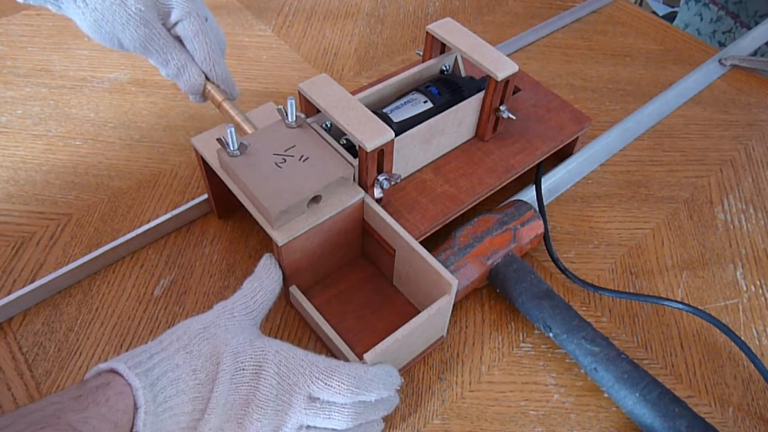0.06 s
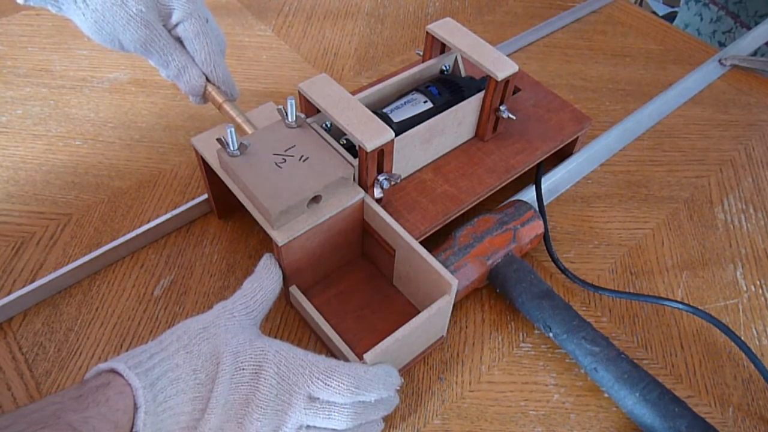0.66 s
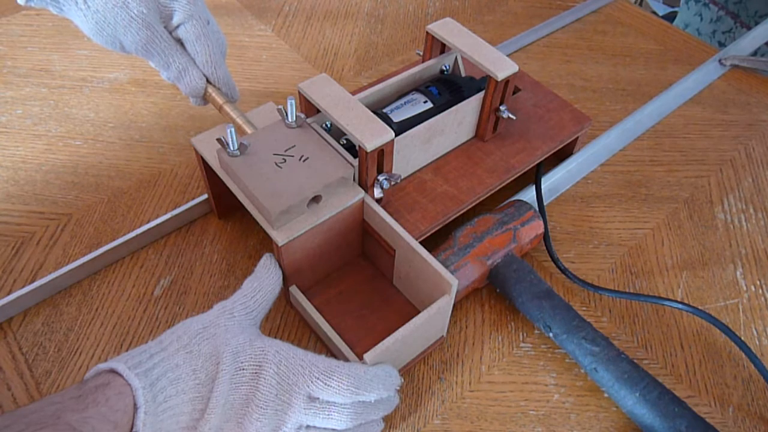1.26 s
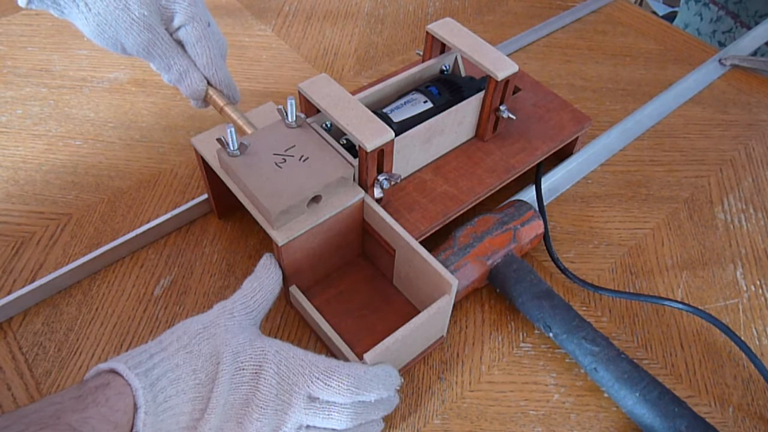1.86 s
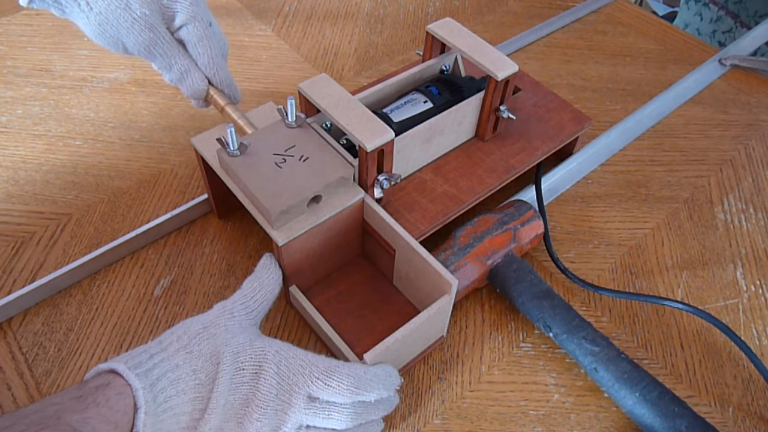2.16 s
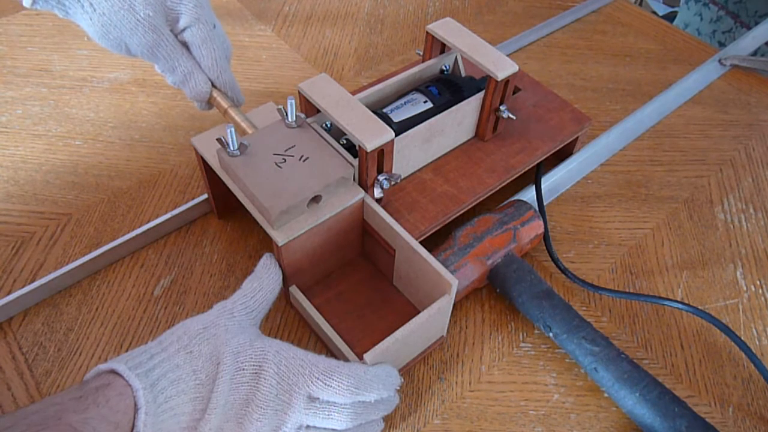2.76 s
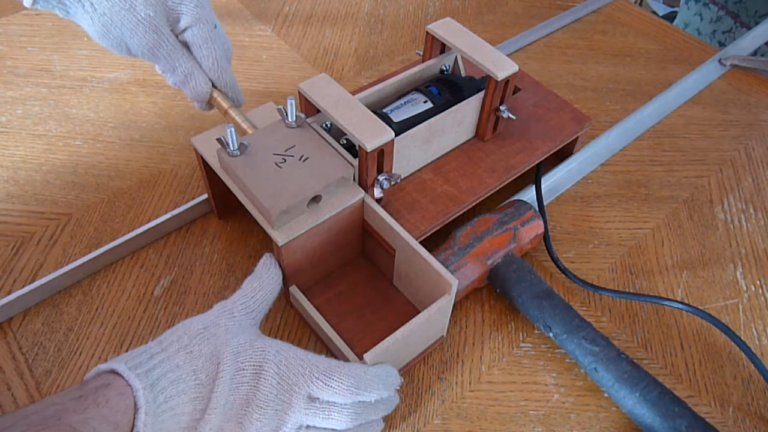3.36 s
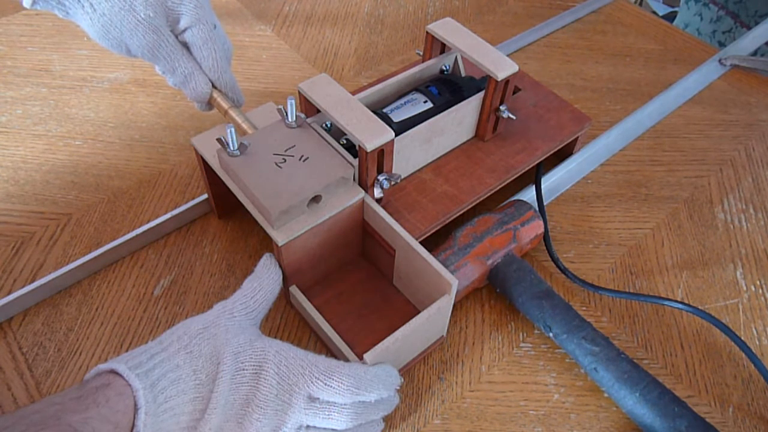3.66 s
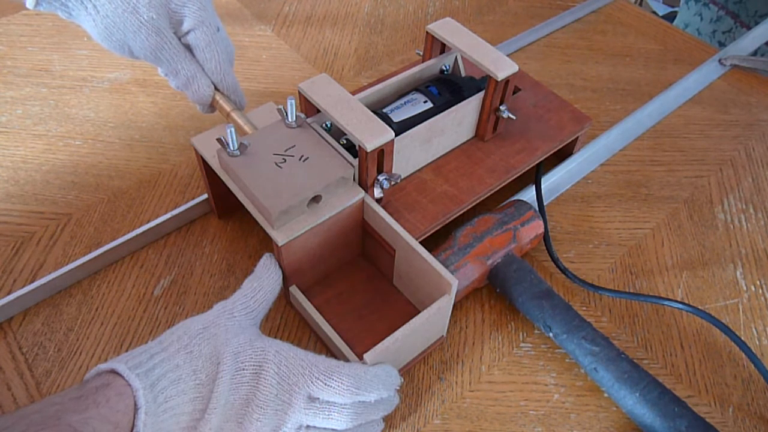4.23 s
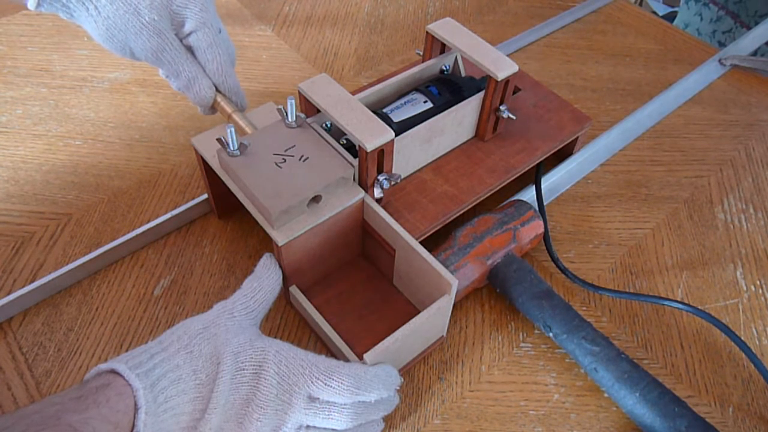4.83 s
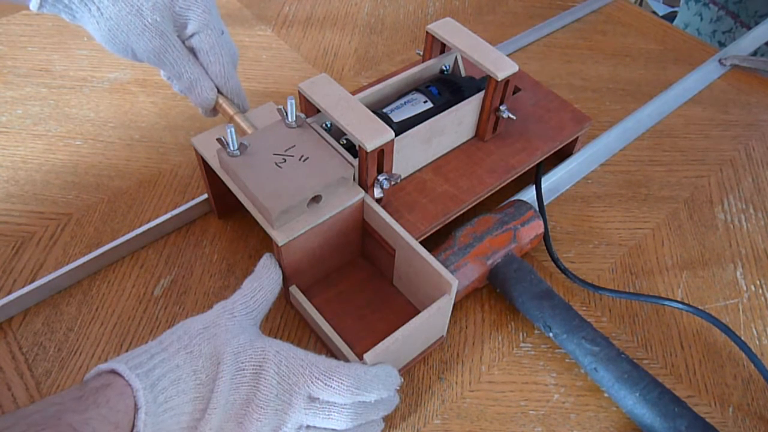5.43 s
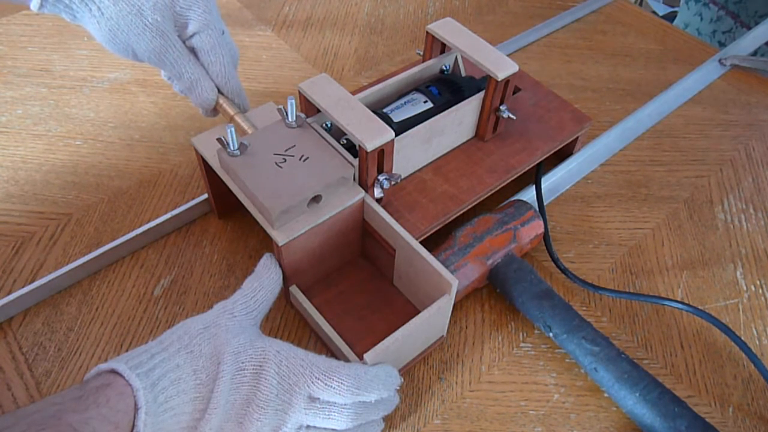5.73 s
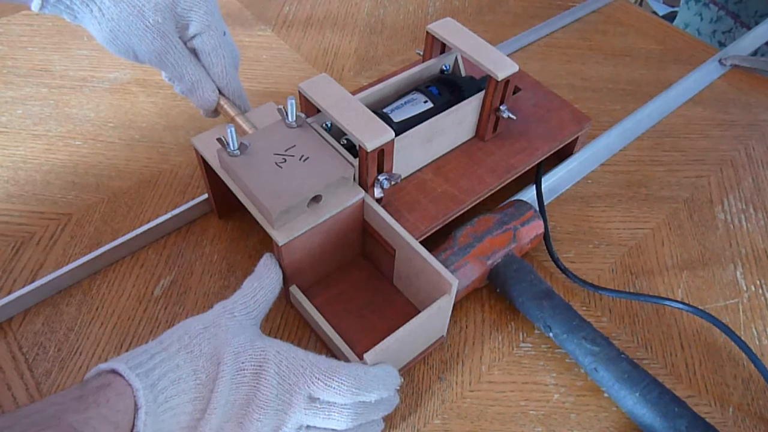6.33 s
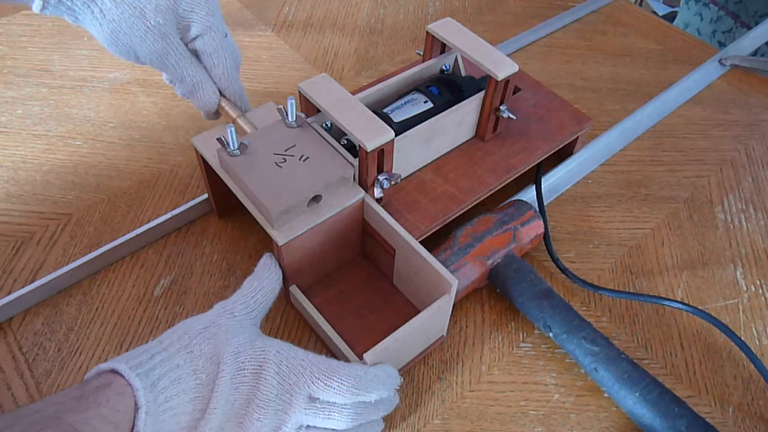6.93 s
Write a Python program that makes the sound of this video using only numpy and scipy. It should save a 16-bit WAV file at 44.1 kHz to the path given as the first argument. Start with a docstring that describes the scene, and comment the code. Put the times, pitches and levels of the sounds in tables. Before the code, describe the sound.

A small rotary tool whines steadily, then drops in pitch with gritty scraping and thin shrieks as its disc cuts into wire.

```python
"""A mains-driven rotary tool whines at high speed, clamped in a wooden jig on a table.
A wire fed against its cutting disc bites lightly, then deeply, and drags the motor down.
The falling tones swell and dip through peaks and notches of room and jig, and excite wire modes.
Mains ripple roughens them. Grit scrapes in a pattern that repeats each turn; the slipping wire shrieks.
Fan air and a faint stator buzz lie underneath."""
import sys
import numpy as np
from scipy import signal
from scipy.fft import rfft, irfft, next_fast_len
from scipy.io import wavfile
from scipy.ndimage import uniform_filter1d, map_coordinates

SR = 44100
rng = np.random.default_rng(int(sys.argv[2]) if len(sys.argv) > 2 else 0)


def master_out(mix):
    """Clip the mix to full scale and print it as 16-bit PCM to the path in sys.argv[1]."""
    frames = np.transpose(np.atleast_2d(mix))
    ceiling = np.clip(frames, -1, 1)
    pcm = np.round(ceiling * 32767).astype(np.int16)
    wavfile.write(sys.argv[1], SR, pcm)


N = 317079
TIME_S = np.arange(N) / SR
FREE_HZ, LIGHT_BITE_HZ, DEEP_BITE_HZ = 467, 432, 323   # shaft speeds
RIPPLE_HZ = 120   # twice mains


def from_db(db):
    """Decibels to gain."""
    return 10 ** (np.asarray(db) / 20)


def unit_rms(x):
    """Scale to rms 1."""
    return x / np.sqrt(np.mean(np.abs(x) ** 2) + 1e-20)


def drift(rate_hz):
    """Slow random wander, rms about 1."""
    hop = 40
    pole = np.exp(-2 * np.pi * rate_hz * hop / SR)
    noise = rng.standard_normal(N // hop + 2002)
    slow = signal.lfilter([1], [1, -2 * pole, pole * pole], noise)[2000:]
    return np.interp(np.arange(N) / hop, np.arange(len(slow)), unit_rms(slow))


def coloured(x, spectrum):
    """Apply a smooth spectral shape; rms 1."""
    size = next_fast_len(N)
    freq_hz, gain_db = np.transpose(spectrum)
    bins_hz = np.maximum(np.arange(size // 2 + 1) * SR / size, 1)
    gain = from_db(np.interp(np.log(bins_hz), np.log(freq_hz), gain_db))
    return unit_rms(irfft(rfft(x, size) * gain, size)[..., :N])


def resonance(x, centre_hz, width_hz):
    """Two-pole band-pass, peak gain 1."""
    radius = np.exp(-np.pi * width_hz / SR)
    feedback = [1, -2 * radius * np.cos(2 * np.pi * centre_hz / SR), radius ** 2]
    return signal.lfilter(np.array([1, 0, -1]) * (1 - radius ** 2) / 2, feedback, x)


def bells_db(bells, pitch_hz):
    """Summed gain of bell-shaped peaks and notches at a pitch."""
    return sum(gain_db * 0.5 ** np.minimum((2 * (pitch_hz - centre_hz) / width_hz) ** 2, 20)
               for centre_hz, width_hz, gain_db in bells)


def stereo(pair, side_db=-25):
    """Mid and side to left and right."""
    return pair[0] + from_db(side_db) * pair[1] * np.array([[1], [-1]])


def mains_ripple(amount):
    """Torque swells twice per mains cycle."""
    return 1 + amount * np.cos(2 * np.pi * RIPPLE_HZ * TIME_S)


def room(x, t60_s=0.68, tail_db=0.5):
    """Direct sound plus the diffuse tail of a small room."""
    age_s = np.arange(SR // 2) / SR
    tail = rng.standard_normal(len(age_s)) * from_db(-60 * age_s / t60_s) * (age_s > 0.003)
    tail = tail / np.sqrt(np.sum(tail ** 2))
    return x + from_db(tail_db) * signal.fftconvolve(x, tail[None], axes=1)[:, :N]


def stator_buzz(load, free_db=-61.5, loaded_db=-52, octave_db=-61, waver_db=1.5):
    """Hum at the ripple rate, growing with current, plus a steady octave."""
    phase = 2 * np.pi * RIPPLE_HZ * TIME_S
    level_db = free_db + load * (loaded_db - free_db) + waver_db * drift(4.6)
    return np.sqrt(2) * (from_db(level_db) * np.sin(phase) + from_db(octave_db) * np.sin(2 * phase))


# Fan and brush spectrum: freq_hz, gain_db
AIR_SPECTRUM = [(30, -21), (100, -10.5), (170, -10.5), (230, -1.5), (400, -0.5), (1300, 1), (2100, 1),
                (3150, 3.5), (4600, 2), (5300, 2), (6800, -2.5), (7600, 0), (9700, -1.5), (12900, -2),
                (15500, -18)]
# Vent rasp, relative to the hiss: centre_hz, width_hz, gain_db
VENT_BANDS = [(3250, 300, -15), (4430, 230, -13.5)]


def fan_air(speed_hz, turns, free_db=-33, flutter_db=0.8, flicker_db=3):
    """Air and brush hiss pulses with shaft and mains; vents rasp. Both fade as the shaft slows."""
    per_turn = 1 + 0.11 * np.cos(2 * np.pi * turns)
    pulsing = mains_ripple(0.08) * per_turn * from_db(flutter_db * drift(23))
    hiss = coloured(rng.standard_normal((2, N)) * pulsing, AIR_SPECTRUM)
    for centre_hz, width_hz, gain_db in VENT_BANDS:
        gain = from_db(gain_db + flicker_db * drift(12))
        hiss += gain * unit_rms(resonance(rng.standard_normal((2, N)), centre_hz, width_hz))
    return from_db(free_db) * (speed_hz / FREE_HZ) ** 3.3 * stereo(hiss)


# Wire slips on the rim: start_s, hold_s, pitch_hz, width_hz, level_db
WIRE_SLIPS = [(5.34, .2, 12200, 260, -36), (5.55, .5, 12300, 350, -43), (6.52, .24, 8560, 70, -37),
              (6.79, .08, 8520, 50, -32)]


def wire_shrieks(attack_s=0.018, release_s=0.026):
    """Friction feeds one narrow mode of wire or disc per slip."""
    out = 0
    for start_s, hold_s, pitch_hz, width_hz, level_db in WIRE_SLIPS:
        attack = np.clip((TIME_S - start_s) / attack_s, 0, 1)
        release = np.exp(-np.maximum(TIME_S - start_s - hold_s, 0) / release_s)
        band = resonance(rng.standard_normal(N), pitch_hz, width_hz)
        ring = unit_rms(resonance(band, pitch_hz, width_hz))
        out += from_db(level_db) * attack * release * ring
    return out


def rim_grit(turns, wear_turns=12.2, lasting_db=-3, rim_points=96):
    """The rough rim passes once a turn; wear renews part of its pattern, the rest lasts."""
    fresh = rng.standard_normal((int(N / SR * 520), rim_points))   # one row per turn, plus spare
    wearing = unit_rms(signal.lfilter([1], [1, -np.exp(-1 / wear_turns)], fresh, axis=0))
    lasting = unit_rms(irfft(np.exp(2j * np.pi * rng.random(rim_points // 2 + 1))))   # flat spectrum
    rim = (wearing + from_db(lasting_db) * lasting).ravel()
    return unit_rms(map_coordinates(rim, [turns * rim_points], order=3, mode="nearest"))


# Scrape level, set by feed pressure: time_s, level_db
FEED_CURVE = [(4.9, -68), (5.2, -35), (5.37, -30.5), (5.45, -32), (5.9, -33), (6.14, -28), (6.29, -28.5),
              (6.38, -25), (6.47, -30.5), (6.54, -28.5), (6.9, -28), (7.12, -28), (7.19, -33)]
# Scrape spectrum: freq_hz, gain_db
SCRAPE_SPECTRUM = [(40, -51), (300, 4), (1000, -2), (1600, -7), (2600, -1.5), (3300, -7.5), (5000, -5),
                   (7000, 1), (9300, -2.5), (11500, 0), (13300, -6), (14600, -4), (15600, -15)]
# Disc and wire resonances: centre_hz, width_hz, light_bite_db, deep_bite_db
DISC_MODES = [(4210, 590, -16, 4), (5820, 140, 10.5, 3), (6190, 150, 1, 12.5), (7540, 250, 3, -23),
              (8370, 51, -3, 1), (8970, 150, 10, 9), (9740, 320, -28, 7), (10880, 200, -5, 11),
              (12250, 250, 6, 15.5), (12450, 120, 12.5, 20)]


def disc_scrape(turns, depth, chips_db=-8, chatter_db=0.9, ring_light_db=-4.5, ring_deep_db=-7):
    """Grit scrapes the wire, chips hiss; the deepening cut damps some modes and frees others."""
    grit = np.array([rim_grit(turns) for _ in range(2)])
    highpass = signal.butter(1, 9000, "high", fs=SR, output="sos")
    chips = signal.sosfilt(highpass, rng.standard_normal((2, N)))
    contact = (grit + from_db(chips_db) * chips) * from_db(chatter_db * drift(24))
    contact *= mains_ripple(0.45 - 0.12 * depth)
    scrape = coloured(room(contact), SCRAPE_SPECTRUM)
    ring = sum(from_db(light_db + depth * (deep_db - light_db)) * resonance(scrape, centre_hz, width_hz)
               for centre_hz, width_hz, light_db, deep_db in DISC_MODES)
    ring_db = ring_light_db + depth * (ring_deep_db - ring_light_db)
    level_db = np.interp(TIME_S, *np.transpose(FEED_CURVE))
    return from_db(level_db) * stereo(unit_rms(scrape + from_db(ring_db) * ring))


# Room and jig peaks and notches: centre_hz, width_hz, gain_db
ROOM_AND_JIG_RESPONSE = [(300.2, 5.0, -10.1), (312.0, 9.7, -12.7), (324.6, 5.5, -9.7), (348.8, 17.4, 4.7),
                         (372.6, 14.2, -13.1), (416.7, 4.5, -8.0), (439.5, 8.0, -7.5), (466.5, 10.0, 2.6),
                         (654.7, 57.5, 15.1), (816.7, 33.8, 8.0), (943.3, 6.0, 3.1), (1421.5, 5.2, -6.9),
                         (1891.8, 16.5, 7.4), (2359.2, 4.5, -8.8)]
# Modes of the pressed wire: centre_hz, width_hz, gain_db, onset_speed_hz
WIRE_MODES = [(1815.0, 70.0, 7.0, 467), (2442.0, 85.0, 13.5, 325), (8515.0, 90.0, 15.0, 330),
              (12272.1, 253.0, 13.9, 467)]


def gliding_tone_gain(order, speed_hz, grip_span_hz=9, hop=20):
    """A tone swells and dips through the room and jig response; wire modes fade in as the shaft slows."""
    coarse_hz = speed_hz[::hop]
    gripped = [(centre_hz, width_hz, gain_db * np.clip((onset_hz - coarse_hz) / grip_span_hz, 0, 1))
               for centre_hz, width_hz, gain_db, onset_hz in WIRE_MODES]
    pitch_hz = order * coarse_hz
    total_db = bells_db(ROOM_AND_JIG_RESPONSE, pitch_hz) + bells_db(gripped, pitch_hz)
    return np.interp(TIME_S, TIME_S[::hop], from_db(total_db))


# Rotor and disc tones, before peaks and notches: order, free_db, light_bite_db, deep_bite_db
SHAFT_TONES = [(1, -19.5, -18, -28.5), (2, -21, -33, -43.5), (3, -32, -41.5, -43), (4, -41.5, -44.5, -68),
               (5, -41, -67, -53), (6, -51.5, -44.5, -51), (7, -49, -59, -76), (8, -48, -48.5, -43.5),
               (10, -52.5, -46, -59), (14, -65, -51, -47), (15, -52.5, -58, -57), (17, -59, -44.5, -64),
               (18, -43.5, -41, -60), (19, -57, -72, -47), (20, -50.5, -73, -47), (25, -73, -58, -51.0),
               (26, -54, -66, -55), (27, -58, -59, -56), (28, -63.1, -52, -51), (30, -83, -74, -54)]
# Torque ripple sidebands, relative to their tone: order, ripple_multiple, free_db, loaded_db
RIPPLE_SIDEBANDS = [(1, -1, -35, -31.5), (1, 1, -18, -13.5), (1, 2, -32, -28), (2, -2, -30, -14.5),
                    (2, -1, -28.5, -6.5), (2, 1, -23, -14), (2, 2, -38, -17), (3, -2, -21.5, -11.5),
                    (3, -1, -28.5, -8), (3, 1, -17.5, -6), (4, -2, -12.5, -12), (4, 1, -37, -3),
                    (8, -1, -7, 1), (8, 1, -28, 3)]


def motor_whine(speed_hz, turns, load, depth, judder, wander_db=0.62, sideband_deep_db=-5):
    """Wavering shaft harmonics; their sidebands grow with current and sink in the deep bite."""
    shaft_phase = 2 * np.pi * turns
    out, tones = 0, {}
    for order, free_db, light_db, deep_db in SHAFT_TONES:
        order = round(order)
        level_db = free_db + load * (light_db - free_db) + depth * (deep_db - light_db)
        level_db += wander_db * np.sqrt(order - 1) * drift(0.5)
        spread = (0.031 + 0.053 * load) * np.sqrt(order) + 0.37 * judder * np.log(order)
        waver = (1 + spread * (drift(17.3) + 1j * drift(12))) / np.sqrt(1 + 2 * spread ** 2)
        phase = order * shaft_phase + 2 * np.pi * rng.random()
        tones[order] = from_db(level_db) * waver * np.exp(1j * phase)
        out += gliding_tone_gain(order, speed_hz) * tones[order].real
    for order, multiple, free_db, loaded_db in RIPPLE_SIDEBANDS:
        shift = np.exp(2j * np.pi * (round(multiple) * RIPPLE_HZ * TIME_S + rng.random()))
        gain_db = free_db + load * (loaded_db - free_db) + depth * sideband_deep_db
        out += from_db(gain_db) * (tones[round(order)] * shift).real
    return np.sqrt(2) * out


# Shaft speed: time_s, speed_hz
SPEED_CURVE = [(0.0, 474.3), (1.325, 471.7), (2.495, 471.4), (5.28, 468.0), (5.41, 445.2), (5.515, 430.8),
               (5.6, 428.9), (5.87, 431.7), (6.02, 428.1), (6.185, 411.4), (6.295, 374.0), (6.41, 327.6),
               (6.505, 314.4), (6.585, 309.6), (6.625, 305.9), (6.755, 304.3), (6.825, 315.5),
               (6.96, 312.0), (7.19, 297.0)]


def scene(judder_hz_per_s=170):
    """Shaft speed sets load and cut depth; speed changes make the tones judder."""
    speed_hz = np.interp(TIME_S, *np.transpose(SPEED_CURVE))
    speed_hz = uniform_filter1d(speed_hz, size=1500, mode="nearest")
    load = np.clip((FREE_HZ - speed_hz) / (FREE_HZ - LIGHT_BITE_HZ), 0, 1)
    depth = np.clip((LIGHT_BITE_HZ - speed_hz) / (LIGHT_BITE_HZ - DEEP_BITE_HZ), 0, 1)
    judder = np.tanh(np.abs(np.gradient(speed_hz)) * SR / judder_hz_per_s)
    tug = (0.0004 + 0.001 * depth) * drift(18)   # uneven wire drag
    turns = np.cumsum(speed_hz * (1 + tug)) / SR
    whine = motor_whine(speed_hz, turns, load, depth, judder)
    background = stator_buzz(load) + fan_air(speed_hz, turns)
    return whine + background + disc_scrape(turns, depth) + wire_shrieks()


def record(dry, cutoff_hz=15700):
    """Steep low-pass."""
    return signal.sosfilt(signal.ellip(10, 0.2, 80, cutoff_hz, fs=SR, output="sos"), dry)


dry = scene()
out = record(dry)
master_out(out)
```